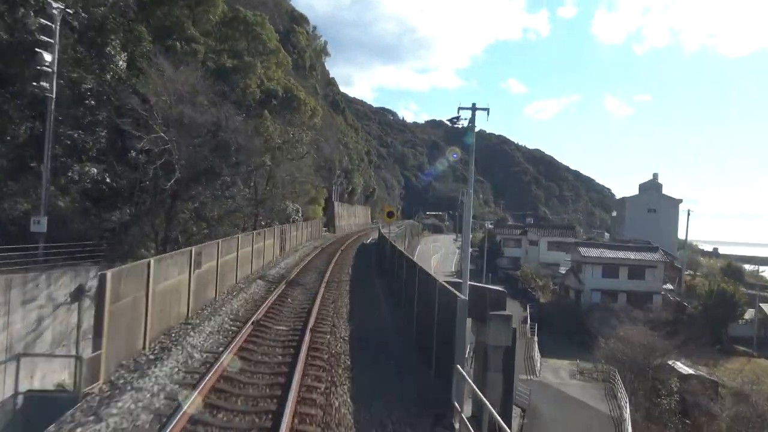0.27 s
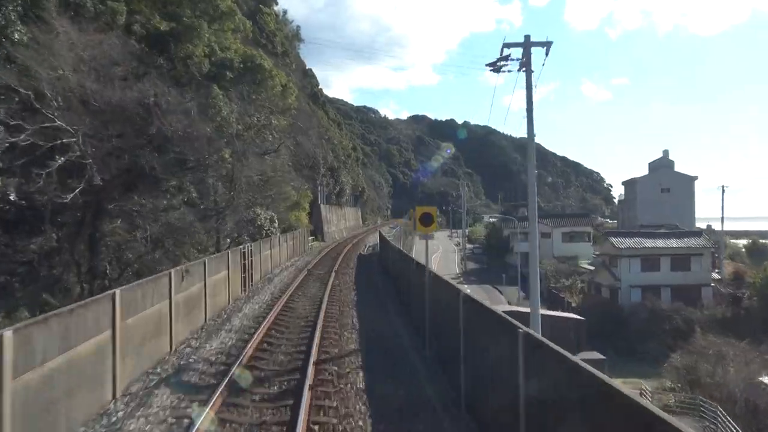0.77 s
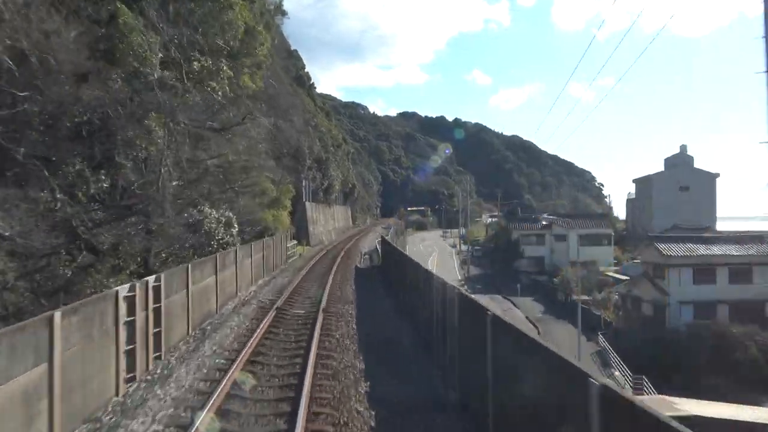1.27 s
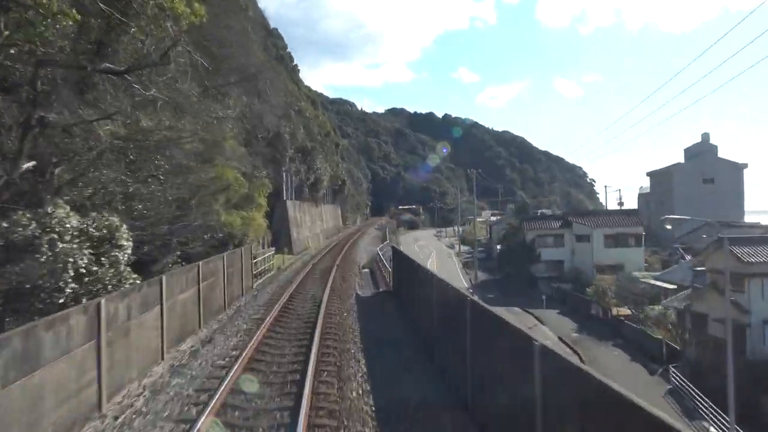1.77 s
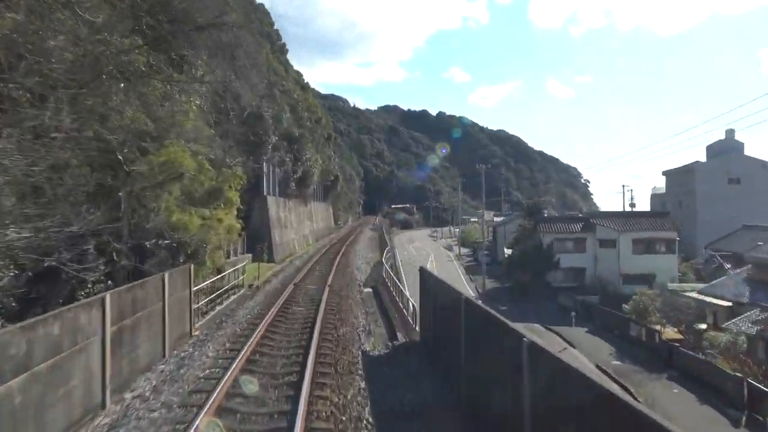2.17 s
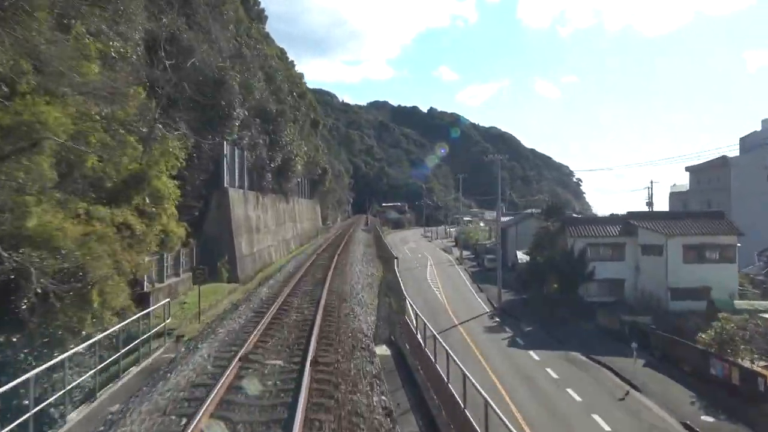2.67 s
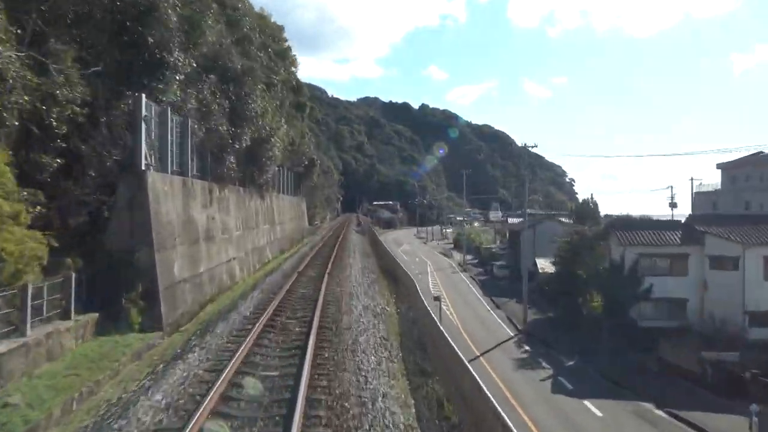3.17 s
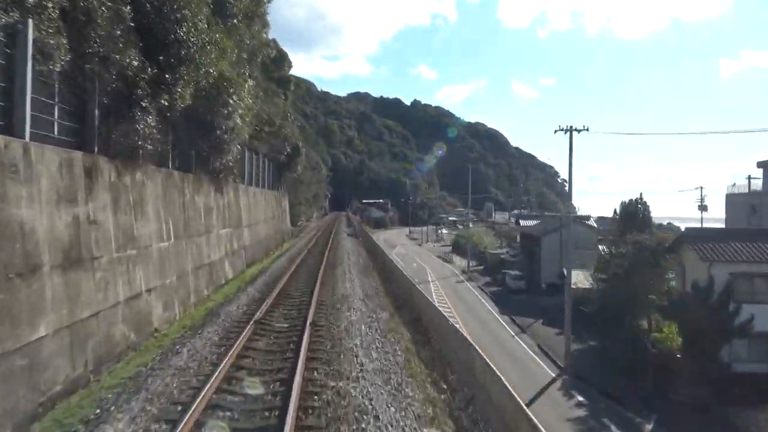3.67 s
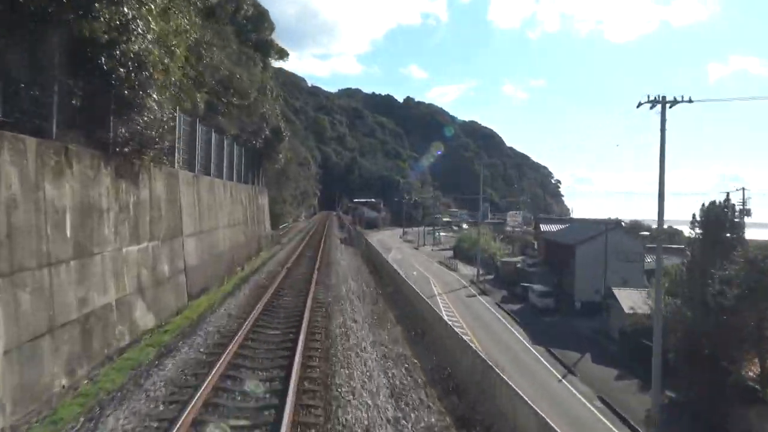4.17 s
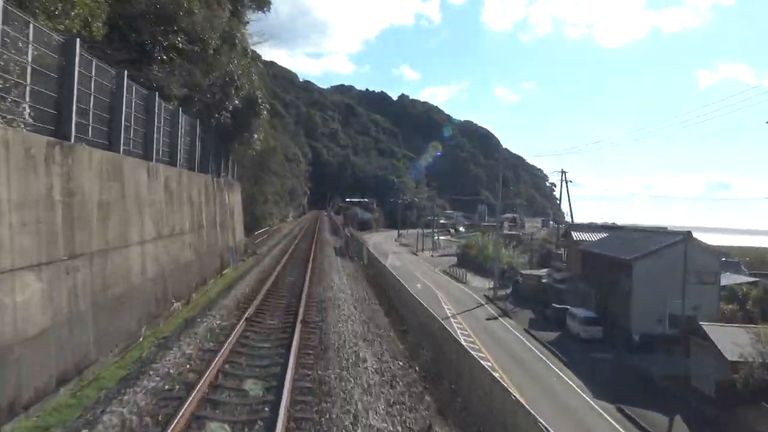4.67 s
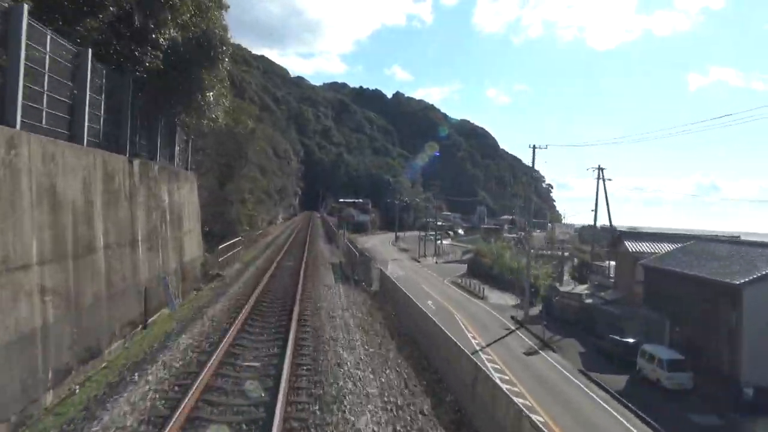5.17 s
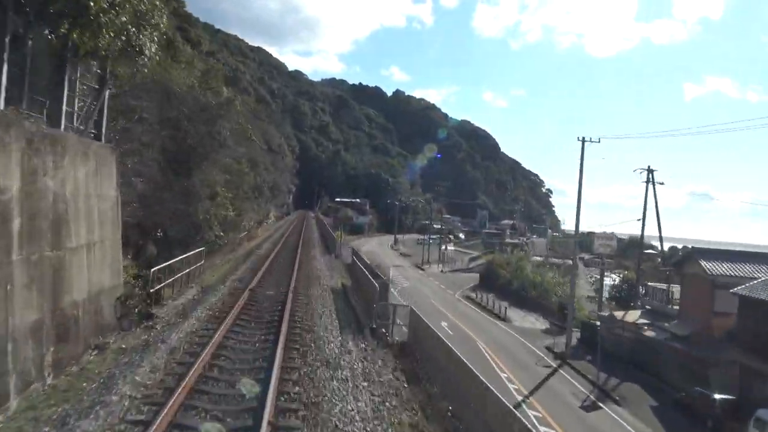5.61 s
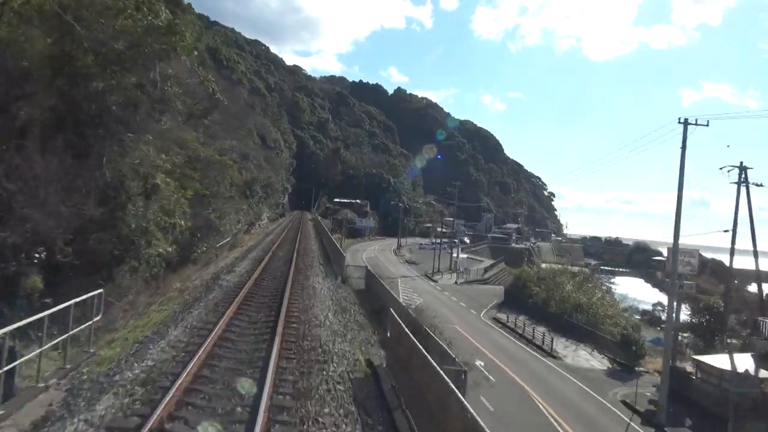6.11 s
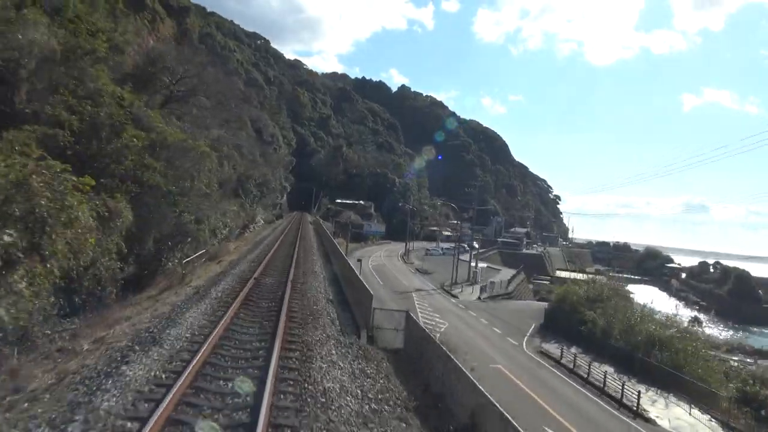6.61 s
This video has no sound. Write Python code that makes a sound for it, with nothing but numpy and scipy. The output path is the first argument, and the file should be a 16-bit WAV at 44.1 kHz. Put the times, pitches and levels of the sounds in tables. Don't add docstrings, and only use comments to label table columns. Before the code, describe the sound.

A cab microphone, close and almost mono, picks up an underfloor diesel holding one buzzing note, with boomy rumble over a hollow deck that becomes a little drier on solid ground. Wheels clack in pairs over joints, air hisses, fittings tick, and a very high faint flange squeal comes and goes. At about four and a half seconds the gear changes and the engine note falls.

```python
import sys
import numpy as np
from scipy import signal
from scipy.fft import rfft, irfft, next_fast_len
from scipy.io import wavfile

SR = 44100
rng = np.random.default_rng(int(sys.argv[2]) if len(sys.argv) > 2 else 0)


def generate_wav(sig):
    pcm = np.round(np.clip(np.atleast_2d(sig).T, -1, 1) * 32767).astype(np.int16)
    wavfile.write(sys.argv[1], SR, pcm)


def invert_db(level):
    return 10 ** (np.asarray(level, dtype=float) / 20)


N = 302085

VIADUCT_ENDS_S, LEAVING_S = 3.6, 0.1


def unit(x):
    return x / np.sqrt(np.mean(x ** 2) + 1e-20)


def in_time(rows):
    s, *columns = np.transpose(rows)
    return [np.interp(np.arange(N) / SR, s, c) for c in columns]


def at_hz(points, hz):
    points = np.array(points)
    return np.interp(np.log(hz), np.log(points[:, 0]), points[:, 1])


def step(at_s, over_s):
    return np.clip((np.arange(N) / SR - at_s) / max(over_s, 0.001) / 2 + 0.5, 0, 1)


def drift(rate):
    r = np.exp(-80 * np.pi * rate / SR)
    white = rng.standard_normal(N // 40 + 2002)
    slow = signal.lfilter([1], [1, -2 * r, r * r], white)[2000:]
    return np.interp(np.arange(N) / 40, np.arange(len(slow)), unit(slow))


def band_filter(x, order, edges_hz):
    return signal.sosfilt(signal.butter(order, edges_hz, "band", fs=SR, output="sos"), x)


def low_pass(x, hz):
    return signal.sosfilt(signal.butter(4, hz, fs=SR, output="sos"), x)


def resonate(x, modes, wander_db=0, order=1):
    out = 0
    for k, (hz, width, level_db) in enumerate(modes):
        r = np.exp(-np.pi * max(width, 1) / SR)
        numerator = [(1 - r * r) / 2, 0, (r * r - 1) / 2]
        denominator = [1, -2 * r * np.cos(2 * np.pi * hz / SR), r * r]
        y = x
        for _ in range(order):
            y = signal.lfilter(numerator, denominator, y)
        swell_db = wander_db * drift(3.5) if wander_db else 0
        out = out + (-1) ** k * y * invert_db(level_db + swell_db)
    return out


# (frequency [Hz], likeness [0 to 1])
STEREO_LIKENESS = [(60, 1.0), (99, 0.87), (160, 0.82), (270, 1), (450, 0.99), (740, 1), (1220, 0.99),
                   (2010, 1), (3330, 1), (5500, 0.98), (9080, 0.75), (15000, 1.0)]


def banded_noise(spectrum, patchy_db, together_db, tilt=0):
    lowest, highest = spectrum[0][0], spectrum[-1][0]
    edges = lowest * 2 ** np.arange(0, np.log2(highest / lowest) + 0.4, 0.45)
    white = rng.standard_normal((2, 2, N))
    out = 0
    for k, (low, high) in enumerate(zip(edges, edges[1:])):
        hz = np.sqrt(low * high)
        band_db = at_hz(spectrum, hz)
        if band_db < -45 or high > 0.45 * SR:
            continue
        mid, side = band_filter(white[k % 2], 2, [low, high])
        alike = np.clip(at_hz(STEREO_LIKENESS, hz), 0, 1)
        gain = invert_db(band_db + together_db + tilt * np.log2(hz / 700) + patchy_db * drift(12))
        out = out + gain * (np.sqrt(1 + alike) * mid + np.sqrt(1 - alike) * side * [[1], [-1]])
    return unit(out)


# (time [s], firing cycles [per s])
ENGINE_SPEED = [(0.0, 17.12), (1.0, 17.2), (2.5, 17.39), (3.9, 17.54), (4.2, 17.55), (4.3, 17.71),
                (4.42, 18.31), (4.52, 18.3), (4.62, 17.25), (4.68, 16.89), (4.74, 15.68), (4.81, 15.5),
                (4.92, 13.93), (5.04, 12.69), (5.3, 12.68), (6.85, 12.7)]


def engine_cycles():
    return np.cumsum(in_time(ENGINE_SPEED)[0]) / SR


PULL_TIMES = [.9, 2.4, 3.4, 4.55, 4.95]
# (order [x cycle], early [dB], midway [dB], late [dB], high gear [dB])
EXHAUST_ORDERS = [(1, -50, -52, -54, -60), (2, -50, -48, -48, -61), (3, -37, -35.5, -40, -48),
                  (4, -52, -45, -47, -48), (5, -28, -33, -50, -50), (6, -24, -23, -23, -40),
                  (7, -33, -40, -47, -50), (8, -33, -28.5, -30, -41), (9, -30, -25, -25, -17),
                  (10, -41, -45, -45, -46), (11, -42, -41, -40.5, -34), (12, -37.5, -42, -52, -30.5),
                  (13, -41, -50, -58, -41), (15, -49, -48, -49, -54), (16, -52, -62, -62, -43.5),
                  (17, -55, -50, -49, -47.5), (18, -52, -47, -42, -49.5), (20, -57, -53, -52.5, -48.5),
                  (21, -53.5, -54, -62, -55), (22, -51, -53, -51, -70), (24, -55, -62, -54, -51.5),
                  (25, -55, -56, -56, -60), (26, -54, -62, -62, -60), (27, -57, -50.5, -55, -57)]
# (order [x cycle], early [dB], midway [dB], late [dB], high gear [dB])
BLOCK_ORDERS = [(33, -58.5, -67, -59.5, -63.5), (34, -58, -52, -54, -67.5), (40, -65, -69, -94, -61.5),
                (45, -74, -73, -64, -57.5), (54, -73, -80, -77, -64), (64.3, -57.5, -56, -60.5, -59.5),
                (73.9, -72, -55, -60.5, -68.5)]
# (time [s], sixth order [dB], ninth order [dB])
PIPE_LOAD = [(0, -25, -21), (.5, -22.5, -27), (1, -23.5, -27), (1.5, -23.5, -35), (2.05, -24.5, -37),
             (2.5, -23, -24), (3, -23.5, -23), (3.5, -23, -25.5), (4.15, -22, -28), (4.42, -19.5, -29),
             (4.59, -19.5, -28), (4.67, -33, -20), (4.73, -31, -31), (4.8, -29, -17), (4.88, -37, -36),
             (5.02, -38, -19), (6, -41.5, -17), (6.85, -45.5, -16)]
LEAN_TIMES = [1.0, 3.2, 4.55, 4.95]
DRONE_LEAN = [0.2, 0.29, 1.7, -0.98]


def engine(cycles):
    t = np.arange(N) / SR
    coarse = t[::64]
    sixth_db, ninth_db = [c[::64] for c in in_time(PIPE_LOAD)]
    coast_db = -8 * np.exp(-((coarse - 4.72) / 0.17) ** 2)
    settle_db = -4 * np.maximum(coarse - 5.7, 0)
    out = 0
    for order, early_db, mid_db, late_db, high_db in list(EXHAUST_ORDERS) + list(BLOCK_ORDERS):
        whole_order = round(order)
        if whole_order == 6:
            level_db = sixth_db
        elif whole_order == 9:
            level_db = ninth_db
        else:
            level_db = np.interp(coarse, PULL_TIMES, [early_db, mid_db, late_db, late_db, high_db])
            level_db = level_db + coast_db + settle_db + 1.7 * drift(1.2)[::64]
        gain = np.interp(t, coarse, invert_db(level_db))
        out = out + gain * np.sin(2 * np.pi * (whole_order * cycles + rng.random()))
    lean_db = np.interp(t, np.add(LEAN_TIMES, [0, 0.21, 0.26, 0.54]), DRONE_LEAN)
    return np.sqrt(2) * out * invert_db(lean_db * [[0.5], [-0.5]])


# (frequency [Hz], width [Hz], level [dB])
STRUCTURE_MODES = [(56.7, 13, 1.5), (66, 11, -2)]
# (frequency [Hz], width [Hz], level [dB])
PANEL_MODES = [(90, 11, 1), (118, 17.3, 5.5), (168, 28, 7), (210, 29, -5)]
PANEL_BOOM = [-30, -31, -30.5, -33, -33.5]
# (time [s], level [dB])
RAIL_DIPS = [(.05, -29), (.37, -29), (.69, -30), (.86, -29), (1.14, -32), (1.33, -29), (1.54, -29),
             (1.78, -28), (1.91, -32), (2.05, -29), (2.26, -30), (2.47, -31), (2.85, -35), (3.2, -29),
             (3.34, -34), (3.49, -27), (3.69, -35), (3.89, -38), (4.72, -36), (4.97, -35), (5.22, -35)]
# (frequency [Hz], level [dB])
ALTERNATOR_HUM = (37, -51)


def body():
    shake = rng.standard_normal((2, N))
    t = np.arange(N) / SR
    coarse = t[::64]
    jolts = sum(invert_db(jolt_db) * np.exp(-((coarse - s) / 0.05) ** 2) for s, jolt_db in RAIL_DIPS)
    jolts = np.interp(t, coarse, jolts)
    swing = np.sqrt(2) * np.sin(2 * np.pi * np.cumsum(56 + 2 * drift(3)) / SR)
    rolling_db = -38 - 2.5 * step(VIADUCT_ENDS_S, LEAVING_S)
    thud = unit(resonate(shake[0], STRUCTURE_MODES, order=2)) * invert_db(rolling_db) + jolts * swing

    boom_db = np.interp(t, PULL_TIMES, PANEL_BOOM)
    panels = resonate(shake[1], PANEL_MODES, 0.75, order=2)
    off_deck = 0.5 * step(VIADUCT_ENDS_S - 0.6, 0.65)
    panels = panels - off_deck * resonate(shake[1], PANEL_MODES[:1], order=2)
    boom = unit(panels) * (invert_db(boom_db) + invert_db(-8) * jolts)

    under = unit(band_filter(shake[1], 2, [16, 40])) * invert_db(0.49 * boom_db - 25.5)
    hum_hz, hum_db = ALTERNATOR_HUM
    hum = np.sqrt(2) * invert_db(hum_db + 1.5 * drift(1.2)) * np.sin(2 * np.pi * hum_hz * t)
    return thud + boom + under + hum


# (time [s], level [dB])
TRACKSIDE = [(0, -59), (.28, -59), (.57, -58.5), (1.05, -56), (1.35, -56.5), (2.15, -56), (2.9, -54),
             (3.1, -55.5), (3.6, -57), (3.9, -57.5), (4.3, -59.5), (4.55, -61.5), (4.9, -59.5),
             (5.3, -59.5), (5.9, -61), (6.41, -63), (6.85, -60.5)]


def trackside_hiss_db():
    return in_time(TRACKSIDE)[0]


# (frequency [Hz], density [dB per Hz])
ROAR_SPECTRUM = [(140, -25), (240, 3.5), (290, -9), (469, -7.5), (580, -11.5), (653, -12.5), (726, -17),
                 (974, -18.5), (1120, -15.5), (2100, -23.5), (4000, -37.5), (5200, -70), (8800, -120)]
# (frequency [Hz], width [Hz], level [dB])
WHEEL_MODES = [(372.4, 8.4, 4.5), (421, 19, -15), (731, 14, -1.5), (909, 15, -7), (1161, 8.2, -13),
               (1259, 13, -12), (1593, 7.1, -10), (1966, 114, -18.5), (2320, 14, -28), (2427, 34, -19),
               (2597, 22, -17), (2756, 20, -21), (3395, 15, -22.5), (3510, 11, -22)]


def roar(swing_db):
    rings = unit(resonate(rng.standard_normal(N), WHEEL_MODES, 0.85)) * invert_db([[-1.2], [1.2]])
    noise = banded_noise(ROAR_SPECTRUM, 0.47, 0.39 * drift(1.2), tilt=0.059 * swing_db)
    grind_db = 2 * np.exp(-((np.arange(N) / SR - 4.45) / 0.49) ** 2)
    parapet_db = -step(2.16, 0.25)
    return invert_db(-37 + grind_db + 0.76 * swing_db + parapet_db) * (noise + invert_db(-10.0) * rings)


# (frequency [Hz], density [dB per Hz])
HISS_SPECTRUM = [(2060, -17.5), (3500, -5), (4350, -4), (5580, 4.5), (5910, 1.5), (6680, -7.5),
                 (8300, -9.5), (10800, -40), (18300, -120)]
# (frequency [Hz], density [dB per Hz])
SIZZLE_SPECTRUM = [(4880, -25), (8300, -1), (9700, -7), (11900, -4), (15000, -7.5)]
# (frequency [Hz], width [Hz], level [dB])
VENT_MODES = [(4720, 40, -0.5), (5070, 81, 1), (5580, 20, 3), (5670, 35, -6.5), (5900, 35, -14),
              (6520, 25, 0), (6700, 30, -5.5), (6850, 27, -4), (7300, 55, -11.5), (6930, 30, -6),
              (7670, 40, -4.5)]
# (start [s], length [s], lift above the draught [dB])
VALVE_PUFFS = [
    (.02, .07, 2),
    (1.5, .15, 2),
    (1.9, .12, 1.5),
    (2.2, .15, 2),
    (3.22, .3, 2),
    (4.0, .2, 2),
    (4.56, .05, 2),
    (4.755, .11, 6.5),
]


def hiss(hiss_db, cycles):
    edge_s = 0.018
    puff_db = sum(lift_db * step(s, edge_s) * (1 - step(s + length, edge_s))
                  for s, length, lift_db in VALVE_PUFFS)
    throb_db = 0.81 * np.sin(2 * np.pi * cycles) + 1.0 * drift(29) + 0.33 * drift(7.3)
    rattle_db = 3.5 + 2.5 * step(VIADUCT_ENDS_S, LEAVING_S) + 0.05 * puff_db
    fittings = unit(resonate(rng.standard_normal(N), VENT_MODES, 1.0)) * invert_db(rattle_db - 10)
    dull = invert_db(hiss_db + puff_db - 3.0) * (banded_noise(HISS_SPECTRUM, 0.33, throb_db) + fittings)
    sizzle_db = -64 + 1.4 * (hiss_db - hiss_db.mean()) + 0.6 * puff_db
    sizzle = low_pass(banded_noise(SIZZLE_SPECTRUM, 0.83, throb_db), 13500)
    return dull + invert_db(sizzle_db) * sizzle


# (start [s], hold [s], peak [dB], release [dB per s])
FLANGE_BITES = [
    (-.15, .28, -70.5, 71),
    (.87, .06, -62, 47),
    (1.752, 0.11, -61, 28.5),
    (2.06, 0.15, -67, 27),
    (2.844, 0.08, -69.5, 14.5),
    (3.298, 0.06, -73, 23.5),
    (3.956, 0.27, -70.5, 82.5),
    (4.375, 0.099, -72.5, 5),
]


def flange():
    rise_s, curve_ends_s = 0.12, 5.33
    t = np.arange(0, N + 64, 64) / SR
    level = invert_db(-83)
    for s, hold, peak_db, fall in FLANGE_BITES:
        rise = np.clip((t - s) / rise_s, 0, 1) ** 1.5
        level = level + rise * invert_db(peak_db - fall * np.maximum(t - s - rise_s - hold, 0))
    level = level * invert_db(-7.5 * np.maximum(t - curve_ends_s, 0))
    level = np.interp(np.arange(N) / SR, t, level)
    slips = rng.standard_normal(N) * invert_db(1.8 * drift(150))
    squeal = unit(resonate(slips, [(16350, 1000, 0)], order=2))
    return squeal * level * invert_db(-21 * step(curve_ends_s, 0.08) + 1.2 * drift(8) + 2.0)


# (centre [s], half length [s], frequency [Hz], climb [Hz per s], level [dB])
GEAR_WHINES = [(.7, .35, 866, 0, -52.5), (2.2, .6, 866, 0, -59), (.6, .8, 1973, 8, -66),
               (2.3, .75, 1996, 17, -57), (4.4, .8, 1988, 0, -67), (1.9, .55, 2270, 15, -62),
               (2.65, .3, 1390, 12, -59), (4.05, .35, 1420, 10, -60.5), (4.95, .05, 1408, 0, -57),
               (2.2, .6, 1647, 0, -62), (3.8, .15, 1593, 0, -59), (2.9, .4, 1291, 5, -59),
               (2.6, .5, 2817, 10, -72), (4.2, 1, 738, 0, -59), (6.2, .7, 570, 0, -58),
               (2.6, .5, 592, 0, -55), (6, .8, 2573, 0, -72), (5.2, 1, 2449, 0, -72),
               (1.3, .9, 1135, 12, -58.5), (4.1, .4, 2600, 0, -69), (4.96, .08, 3950, -4500, -69)]


def whines():
    out, t = np.zeros(N), np.arange(N) / SR
    unsteady = [drift(7.2) for _ in range(3)]
    for k, (s, half, hz, climb, level_db) in enumerate(GEAR_WHINES):
        near = slice(max(0, round((s - 2 * half) * SR)), round((s + 2 * half) * SR))
        u = t[near] - s
        phase = 2 * np.pi * (hz * u + climb * u ** 2 / 2) + 1.18 * unsteady[(k + 1) % 3][near]
        swell = invert_db(level_db + 2.5 * unsteady[k % 3][near]) * np.exp(-(u / half) ** 4)
        out[near] += swell * np.sqrt(2) * np.sin(phase)
    return out * invert_db([[-1.2], [1.2]])


# (time [s], first blow [dB], after-ring [dB], low thump [dB], wheel rim [dB])
RAIL_JOINTS = [(0.051, -49, -50, -40, -66), (.16, -43, -38, -32, -60), (1.065, -42, -34.5, -34, -55),
               (1.175, -47, -34.5, -30, -53), (1.27, -51, -38, -40, -66), (2.234, -42, -32, -27, -58),
               (2.321, -45, -33, -31.5, -60), (3.341, -45, -36, -34, -57), (3.45, -49, -37, -36.5, -62),
               (4.48, -45, -37, -33, -58), (4.575, -46, -36, -38.5, -55), (5.42, -47, -39, -42, -66),
               (5.486, -45, -32.5, -34, -54), (5.592, -45, -37, -37, -54), (6.615, -37, -33, -35, -58),
               (6.718, -44, -37, -32, -62)]
# (frequency [Hz], width [Hz], level [dB])
BLOW_MODES = [(560, 400, -4), (1260, 260, 2), (1870, 220, -4)]
# (frequency [Hz], width [Hz], level [dB])
FRAME_MODES = [(380, 45, 8), (519, 120, 3), (700, 90, -1), (1140, 120, -9), (2050, 200, -16),
               (3270, 70, -21), (3910, 70, -29)]
# (frequency [Hz], width [Hz], level [dB])
RIM_MODES = [(2590, 45, 3), (3250, 110, -7), (2900, 500, -12)]


def joints():
    out, t = np.zeros(N), np.arange(SR // 4) / SR
    rim_swell_s = 0.028
    for s, blow_db, ring_db, thump_db, rim_db in RAIL_JOINTS:
        noise = rng.standard_normal((5, len(t)))
        colour = rng.standard_normal((len(FRAME_MODES), 2))
        blow = resonate(noise[0] * t * np.exp(-t / 0.004), BLOW_MODES, order=2)
        blow = blow / np.abs(blow).max()

        modes = [(hz * (1 + 0.03 * a), width, db + b)
                 for (hz, width, db), (a, b) in zip(FRAME_MODES, colour)]
        ring = unit(low_pass(resonate(noise[1], modes), 4500))
        clatter = unit(band_filter(signal.lfilter([1], [1, -0.8], noise[3]), 4, [700, 3600]))
        ring = (ring + invert_db(-13) * clatter) * t / 0.035 * np.exp(1 - t / 0.027)

        rim = unit(resonate(noise[4], RIM_MODES, order=2))
        rim = rim * t / rim_swell_s * np.exp(1 - t / rim_swell_s)
        thump = unit(resonate(noise[2], [(73, 42, -1.5), (210, 51, -4)]))
        thump = thump * (1 - np.exp(-t / 0.0027)) * np.exp(-t / 0.083)

        knock = invert_db(blow_db + 7.5) * blow + invert_db(ring_db) * ring
        knock = knock + invert_db(rim_db) * rim + invert_db(thump_db + 6.0) * thump
        i = round(s * SR)
        out[i:i + len(t)] += knock[:N - i]
    return out


# (time [s], peak [dB], frequency [Hz], width [share of pitch], rattle [s])
LOOSE_FITTINGS = [(.158, -44, 6500, 1.8, .0008), (.1605, -33, 8000, 2.2, .0005),
                  (0.1629, -21, 340, 2.5, .0008), (.163, -47, 5000, 1.2, .0008),
                  (3.475, -43, 7000, 1.4, .001), (3.6152, -46, 6500, 1.2, .001),
                  (4.0522, -38, 6500, 1.5, .0004), (4.054, -46, 4600, .4, .002),
                  (4.079, -46, 5500, 1, .0006), (4.181, -47, 6200, .6, .003),
                  (4.1845, -43, 5100, .35, .003), (4.567, -51, 9000, 1.8, .0008),
                  (5.055, -50, 6800, .5, .003), (5.191, -48, 6000, .4, .002), (5.202, -43, 5200, .6, .002),
                  (5.2025, -47, 3800, .3, .002)]


def ticks():
    out, t = np.zeros(N), np.arange(SR // 40) / SR
    for s, peak_db, hz, share, rattle_s in LOOSE_FITTINGS:
        snap = 2.5 * (rattle_s < 0.0015) * (t == 0) * 8000 / hz
        rattle = rng.standard_normal(len(t)) * np.exp(-t / rattle_s)
        burst = resonate(snap + rattle, [(hz, share * hz, 0)], order=2)
        i = round(s * SR)
        out[i:i + len(t)] += invert_db(peak_db) * burst / np.abs(burst).max()
    return out


# (centre [s], frequency [Hz], peak [dB], half length [s])
GEARBOX_MODES = [
    (4.575, 76, -28, .035),
    (4.56, 200, -31, 0.06),
    (4.6, 380, -46, .025),
]


def clunk():
    t = np.arange(N) / SR
    return sum(invert_db(peak_db + 7.0) * np.exp(-((t - s) / half) ** 2) * np.sin(2 * np.pi * hz * t)
               for s, hz, peak_db, half in GEARBOX_MODES)


def scene():
    cycles = engine_cycles()
    hiss_db = trackside_hiss_db()
    centre = body() + flange() + joints() + ticks() + clunk()
    moving_air = roar(hiss_db - hiss_db.mean()) + hiss(hiss_db, cycles)
    return engine(cycles) + whines() + centre + moving_air


def top_cut(x):
    return signal.sosfilt(signal.butter(12, 17850, fs=SR, output="sos"), x)


# (frequency [Hz], left minus right [dB])
MICROPHONE_LEAN = [(60, 2), (92, 2.6), (140, 1.8), (210, .3), (315, -2.5), (500, -2), (770, -.8),
                   (1170, -2), (1400, -2.6), (1790, -1), (2740, -.7), (4190, -.7), (6410, -1), (9810, -.4)]


def record(dry):
    size = next_fast_len(N + SR // 4)
    dry = np.pad(dry, [(0, 0), (0, size - N)], "reflect", reflect_type="odd")
    dry = dry * np.minimum(1, np.arange(size)[::-1] / 4000)
    hz = np.fft.rfftfreq(size, 1 / SR) + 1
    lean = invert_db(at_hz(MICROPHONE_LEAN, hz) / 2)
    left, right = rfft(dry) * [lean, 1 / lean]
    mid = (left + right) / 2
    side = (left - right) / 2 * (hz < 11400)
    mix = irfft(np.array([mid + side, mid - side]) * (hz < 16520), size)[:, :N]
    mix = mix * np.sin(np.pi / 2 * np.minimum(1, np.arange(N)[::-1] / 120))
    return top_cut(mix)


dry = scene()
out = record(dry)
generate_wav(out)
```